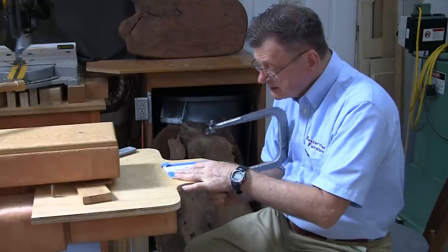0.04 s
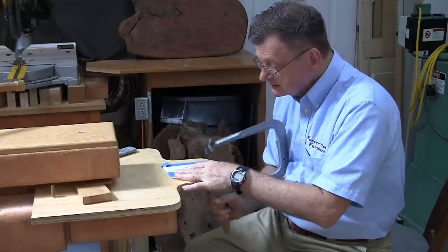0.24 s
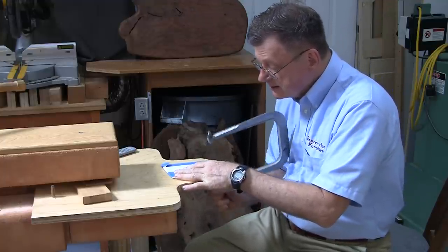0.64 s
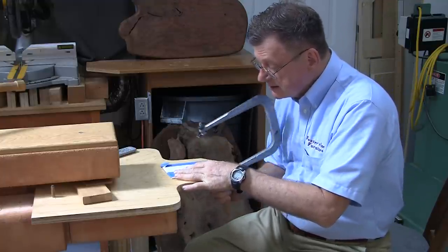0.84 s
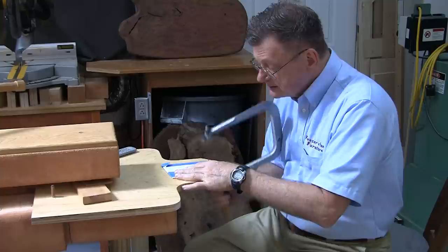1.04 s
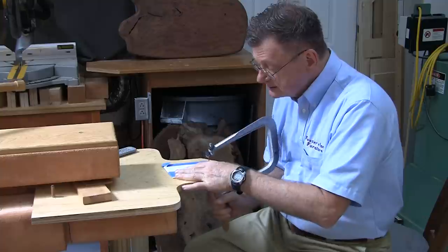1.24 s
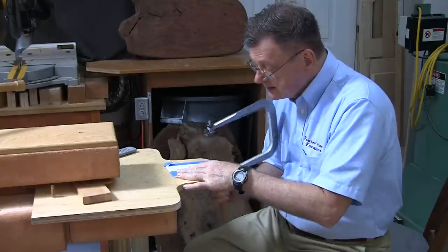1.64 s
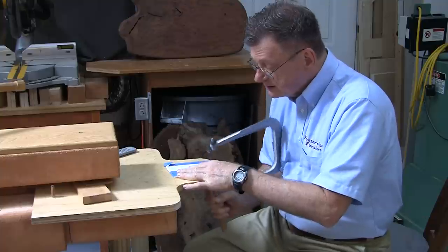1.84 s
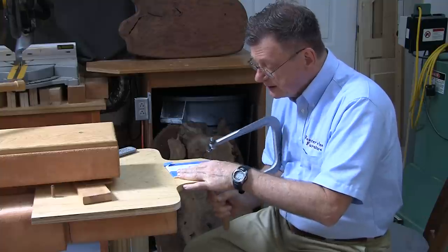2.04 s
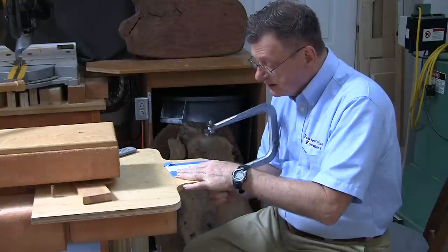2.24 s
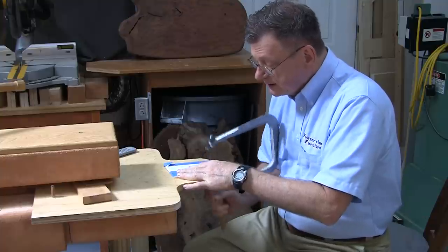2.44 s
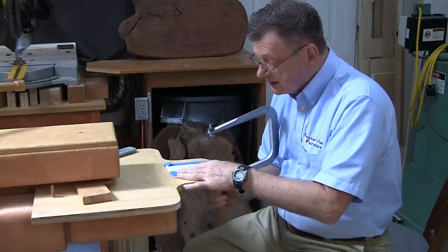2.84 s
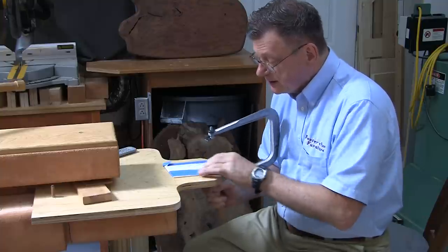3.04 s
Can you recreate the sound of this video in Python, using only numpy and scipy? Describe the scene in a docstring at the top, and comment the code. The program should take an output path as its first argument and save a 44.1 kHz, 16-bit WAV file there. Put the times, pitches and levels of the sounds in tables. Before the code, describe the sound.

A fine hand saw rasps slowly through a thin wooden sheet, close by in a small, quiet workshop. Each strong stroke makes the blade sing and the table thump; each return scrapes softly as the sheet slaps back.

```python
"""A fret saw cuts veneer on a wooden saw table in a small workshop, about three strokes in two seconds. Quiet
room noise and a low hum run throughout. From 0.2 s, on each down stroke, the teeth strike the sheet, tear
fibres and ring the table; the blade sings, and the table jolts with a thud and booms. From 0.6 s, on each way
up, the blade only scrapes, and the lifted veneer slaps back. After each sound the room rings for half a second."""
import sys
import numpy as np
from scipy import signal
from scipy.fft import rfft, irfft
from scipy.io import wavfile
from scipy.ndimage import uniform_filter1d

SR = 44100
rng = np.random.default_rng(int(sys.argv[2]) if len(sys.argv) > 2 else 0)


def unload_wav(signal):
    """Save mono or channel-first audio to the path in sys.argv[1] as 16-bit WAV at rate SR, clipped to [-1, 1]."""
    wavfile.write(
        sys.argv[1],
        SR,
        np.round(np.clip(np.atleast_2d(signal).T, -1, 1) * 32767).astype(np.int16),
    )


N = 141120


def undb(db):
    """Decibels to gain."""
    return 10 ** (np.asarray(db) / 20)


def unit_rms(x):
    """Scale to an rms of 1."""
    return x / np.sqrt(np.mean(x ** 2) + 1e-18)


def curve_at(table, f_hz):
    """Read a table on a log-frequency axis."""
    points = np.array(table, float)
    return np.interp(np.log(f_hz + 1), np.log(points[:, 0]), points[:, 1])


def wander(rate_hz):
    """Smooth random signal, spread near 1."""
    step = int(SR / rate_hz)
    stairs = np.repeat(rng.standard_normal(N // step + 1), step)
    return uniform_filter1d(stairs, step)[:N] * np.sqrt(3 / 2)


def colour(x, spectrum, modes=(), size=8192):
    """Minimum-phase filter of unit energy: a smooth spectrum with resonances on top."""
    f_hz = np.fft.rfftfreq(size, 1 / SR)
    peaks_db = sum(lift_db / (1 + (2 * (f_hz - hz) / width_hz) ** 2) for hz, width_hz, lift_db in modes)
    cepstrum = irfft(np.log(undb(curve_at(spectrum, f_hz) + peaks_db)))
    cepstrum[1:size // 2] *= 2
    cepstrum[size // 2 + 1:] = 0
    response = irfft(np.exp(rfft(cepstrum)))
    return signal.fftconvolve(x, response / np.sqrt(np.sum(response ** 2)))[:N]


def clicks(times_s, gains):
    """Impulses, each shared between two samples."""
    out = np.zeros(N + 2)
    position = np.clip(np.asarray(times_s) * SR, 0, N)
    index = position.astype(int)
    np.add.at(out, index, gains * (1 - position + index))
    np.add.at(out, index + 1, gains * (position - index))
    return out[:N]


# room noise spectrum: f/Hz, level/dB
AIR_SPECTRUM = [(20, -25), (80, -14), (240, 3), (400, -8), (700, -13), (1200, -9.5), (3000, -15.5),
                (8000, -24), (12000, -30), (16000, -39)]


def room_air(t, noise_db=-53, hum_hz=129, hum_db=-66):
    """Quiet room noise, half common to both sides, with a wavering hum."""
    common = rng.standard_normal(N)
    noise = np.array([colour(unit_rms(common + rng.standard_normal(N)), AIR_SPECTRUM) for _ in range(2)])
    hum = undb(hum_db + 2 * wander(6)) * np.sin(2 * np.pi * hum_hz * t)
    return undb(noise_db) * noise + hum


def stroke_force(age_s, attack_s, hold_s, fade_db_per_s):
    """Force of one stroke: it builds, holds and fades."""
    release_s = np.maximum(age_s - attack_s - hold_s, 0)
    return np.clip(age_s / attack_s, 0, 1) ** 1.14 * undb(-fade_db_per_s * release_s)


def fibres(snaps_per_s=2600, scatter_db=7, grip_db=-0.97):
    """Dense tiny snaps of wood fibres under a wavering grip."""
    snaps = (rng.random(N) < snaps_per_s / SR) * rng.choice([-1, 1], N)
    gains = undb(scatter_db * np.clip(rng.standard_normal(N), -2, 2))
    return unit_rms(snaps * gains) * undb(grip_db * wander(70))


# resonances of table and sheet: f/Hz, width/Hz, lift/dB
WOOD_MODES = [(246, 20, 6), (323.6, 59, 8.5), (513, 45, 3.5), (574, 75, 7), (724.5, 35, 6.5),
              (768, 41, 4.5), (944, 39, 2.5), (1230, 186, 5.5), (1607, 48, 2.5), (1760, 180, 2.5),
              (2550, 440, 3.5), (2990, 640, 4)]
# spectra of rub, hiss and shaken table: f/Hz, level/dB
RUB_SPECTRUM = [(90, -28.5), (250, -2), (700, -3), (1800, 5), (3200, 0.5), (3800, -6.5), (6500, -12),
                (10000, -85), (16000, -59)]
HISS_SPECTRUM = [(1000, -24), (3500, 6), (5500, 4), (9000, 1.5), (11500, -9.5), (16000, -18)]
TABLE_SPECTRUM = [(30, -42), (95, -23), (130, -4.5), (260, -4.5), (420, -9), (700, -0.5), (1200, -13.5),
                  (4000, -39.5)]
# light scrapes: t/s, attack/s, hold/s, rub/dB, hiss/dB, table/dB
KERF_SCRAPES = [(-.02, 0.0067, 0.0089, -44, -55, -43.5), (0.614, 0.019, 0.12, -30, -44.5, -37.5),
                (0.706, 0.022, 0.051, -55, -49.5, -36), (1.369, 0.053, 0.083, -33.5, -43.5, -35.5),
                (1.472, 0.0098, 0.063, -39, -65, -37), (1.64, 0.036, 0.017, -40, -51.5, -46.5),
                (2.08, 0.015, 0.1, -36, -44, -46.5), (2.197, 0.0073, 0.019, -34.5, -48, -32.5),
                (2.623, 0.026, 0.071, -32, -39.5, -60), (2.74, 0.027, 0.033, -30.5, -37.5, -33),
                (2.885, 0.024, 0.011, -29.5, -47, -26.5)]


def scrapes(t, fade_db_per_s=253):
    """The backs of the teeth rub through the kerf and lightly shake the table."""
    drives = np.zeros((3, N))
    for start_s, attack_s, hold_s, *levels_db in KERF_SCRAPES:
        drives += undb(levels_db)[:, None] * stroke_force(t - start_s, attack_s, hold_s, fade_db_per_s)
    spectra = RUB_SPECTRUM, HISS_SPECTRUM, TABLE_SPECTRUM
    return sum(colour(drive * fibres(), spectrum, WOOD_MODES) for drive, spectrum in zip(drives, spectra))


def bending_waves(x, spread_s=0.001992):
    """Bending waves in the sheet: each frequency leaves with its own small delay."""
    spectrum = rfft(x)
    delay_s = spread_s * np.abs(wander(60)[:len(spectrum)])
    return irfft(spectrum * np.exp(-2j * np.pi * np.cumsum(delay_s) * SR / N), N)


# blade speed on the down strokes: t/s, tooth rate/Hz
BLADE_SPEED = [(.215, 371.2), (.24, 350.4), (.262, 347.4), (.295, 325.5), (1.1, 285.7), (1.17, 278.1),
               (1.25, 284), (1.8, 240.9), (1.835, 226.2), (1.88, 246.6), (2.44, 264.1), (2.49, 296.4),
               (2.6, 293.9)]


def tooth_rate(t, unsteadiness=0.015):
    """Teeth crossing the sheet per second, driven by an unsteady hand."""
    return np.interp(t, *np.array(BLADE_SPEED).T) * (1 + unsteadiness * wander(60))


def tooth_knocks(t, cycles, scatter_cycles=0.0802, scatter_db=7.5):
    """One impulse per tooth; uneven teeth scatter timing and level."""
    teeth = np.arange(int(cycles[-1]))
    timing, strength = rng.standard_normal((N // 64, 2))[:len(teeth)].T
    times_s = np.interp(teeth + scatter_cycles * timing, cycles, t)
    return clicks(times_s, undb(scatter_db * np.tanh(strength)))


# spectra of tearing, tooth knocks and table thrum: f/Hz, level/dB
RASP_SPECTRUM = [(70, -54), (200, -4), (450, 0), (650, 2), (1200, 0), (3200, 0), (3850, -9.5), (6500, -23),
                 (10000, -28), (16000, -39)]
TEETH_SPECTRUM = [(70, -38), (260, -9.5), (430, -1), (600, 0.5), (1000, -1.5), (1500, -3), (2800, -7.5),
                  (4500, -12), (16000, -47)]
THRUM_SPECTRUM = [(30, -42), (95, -36), (135, -6), (215, -4), (320, -5), (450, -3), (900, -24.5),
                  (4000, -54)]
# down strokes: t/s, attack/s, hold/s, fade/(dB/s), rasp/dB, hiss/dB, teeth/dB, thrum/dB
DOWN_STROKES = [(0.196, 0.028, 0.077, 268, -23, -32, -22.5, -27.5),
                (1.071, 0.033, 0.044, 176, -21, -30.5, -25.5, -25.5),
                (1.769, 0.032, 0.095, 269, -22.5, -37, -25.5, -27.5),
                (2.411, 0.034, 0.065, 219, -20.5, -32.5, -23, -32)]


def cuts(t, tooth_hz, brake_s=0.095, slowest_hz=124.4, tear_cycles=0.3, tear_floor=0.24, lag_s=0.019):
    """Each tooth knocks the sheet and tears fibres; the cut hisses and the table thrums just after."""
    rasp, hiss, teeth, thrum = np.zeros((4, N))
    for start_s, attack_s, hold_s, fade_db_per_s, rasp_db, hiss_db, teeth_db, thrum_db in DOWN_STROKES:
        age_s = t - start_s
        force = stroke_force(age_s, attack_s, hold_s, fade_db_per_s)
        late_force = stroke_force(age_s - lag_s, attack_s, hold_s, fade_db_per_s)
        # the saw brakes to a coarse chatter at the bottom of the stroke
        braking = np.exp(-np.maximum(age_s - attack_s - hold_s, 0) / brake_s)
        rate_hz = np.maximum(tooth_hz * braking, slowest_hz)
        cycles = np.cumsum(rate_hz) / SR
        knocks = np.sqrt(SR / rate_hz) * tooth_knocks(t, cycles)
        bursts = tear_floor + np.exp(-(cycles % 1) / tear_cycles)
        tearing = unit_rms(bursts * rng.standard_normal(N))
        rasp += undb(rasp_db) * force * tearing
        hiss += undb(hiss_db) * force ** 1.2 * fibres()
        teeth += undb(teeth_db) * force * knocks
        thrum += undb(thrum_db) * late_force ** 1.24 * unit_rms(knocks + 1.58 * tearing)
    sheet = colour(rasp, RASP_SPECTRUM, WOOD_MODES) + colour(teeth, TEETH_SPECTRUM, WOOD_MODES)
    sheet += colour(hiss, HISS_SPECTRUM)
    return bending_waves(sheet) + colour(thrum, THRUM_SPECTRUM, WOOD_MODES)


# blade notes: t/s, length/s, multiple of tooth rate, level/dB, overtones/dB re note, groan/dB
BLADE_NOTES = [(0.209, 0.12, 2, -14, -6.5, -21), (1.087, 0.168, 2, -18, -12, -17),
               (1.81, 0.12, 3, -24.5, -32, -33), (2.442, 0.17, 2, -16, -1.5, -27.5)]
# blade overtones: multiple of tooth rate, relative level/dB
BLADE_OVERTONES = [(3, -7), (4, -4), (5, -4), (6, -10)]


def blade_song(t, tooth_hz, edge_s=0.029, flutter_db=3, fade_db_per_s=35.6,
               groan_peak_s=0.053, groan_width_s=0.031):
    """The taut blade rings on a multiple of the tooth rate, over a brief groan at the rate itself."""
    out = np.zeros(N)
    phase = 2 * np.pi * np.cumsum(tooth_hz) / SR
    for start_s, length_s, multiple, level_db, overtones_db, groan_db in BLADE_NOTES:
        age_s = np.clip(t - start_s, 0, length_s)
        gate = np.clip(np.minimum(age_s, length_s - age_s) / edge_s, 0, 1)
        upper = sum(undb(db + flutter_db * wander(50)) * np.sin(k * phase) for k, db in BLADE_OVERTONES)
        note = undb(flutter_db * np.tanh(wander(70))) * np.sin(multiple * phase)
        note += undb(overtones_db) * upper
        groan = np.exp(-((age_s - groan_peak_s) / groan_width_s) ** 2) * np.sin(phase)
        out += gate * (undb(level_db - fade_db_per_s * age_s) * note + undb(groan_db) * groan)
    return out


# table jolts: t/s, thud/dB, boom/dB
TABLE_JOLTS = [(0.317, -18.5, -34.5), (1.189, -23, -37.5), (1.828, -17.5, -38), (1.902, -21, -35),
               (2.466, -32, -43), (2.93, -29.5, -42)]


def jolts(t, thud_hz=219, thud_width_s=0.012, boom_hz=125.2, boom_rise_s=0.023, boom_t60_s=0.87):
    """The table jolts with a thud; its lowest mode swells and booms on."""
    out = np.zeros(N)
    for at_s, thud_db, boom_db in TABLE_JOLTS:
        offset_s = t - at_s
        thud = np.exp(-(offset_s / thud_width_s) ** 2) * np.sin(2 * np.pi * thud_hz * offset_s)
        age_s = np.maximum(offset_s, 0)
        swell = np.minimum(age_s / boom_rise_s, 1) * undb(-60 * age_s / boom_t60_s)
        boom = swell * np.sin(2 * np.pi * boom_hz * age_s)
        out += undb(thud_db) * thud + undb(boom_db) * boom
    return out


# clack spectrum: f/Hz, level/dB
CLACK_SPECTRUM = [(80, -74), (200, 2), (700, -5), (1900, 8.5), (3200, -1), (4500, -4), (9000, -21),
                  (16000, -24)]
# veneer slaps: t/s, relative clack/dB, relative edge/dB
VENEER_SLAPS = [(0.72, -7, -35), (0.7253, -3, -45), (.7312, -5, -42), (1.406, -5, -38), (1.411, -9, -32),
                (2.1008, -18.5, -29.5), (2.107, -20.5, -30), (2.131, -20, -33), (2.2194, -16, -31.5),
                (2.79, -10, -35), (2.801, -16, -27), (2.926, -25, -32)]


def slaps(t, rattle_s=0.0024):
    """The sheet snaps back on the table: a woody clack with a brief rattle and a bright edge."""
    clack, edge = np.zeros((2, N))
    for at_s, clack_db, edge_db in VENEER_SLAPS:
        rattle = (t > at_s) * np.exp(-np.abs(t - at_s) / rattle_s) * rng.standard_normal(N)
        crack = clicks([at_s], 1) + rattle / np.sqrt(np.sum(rattle ** 2))
        clack += undb(clack_db) * crack
        edge += undb(edge_db) * crack
    return undb(7) * colour(clack, CLACK_SPECTRUM, WOOD_MODES) + undb(15) * colour(edge, HISS_SPECTRUM)


# room decay: f/Hz, T60/s
WORKSHOP_DECAY = [(120, 0.54), (300, 0.28), (700, 0.5661), (2500, 0.4055), (6000, 0.65), (14000, 0.15)]
# room width: f/Hz, side/dB re mid
WORKSHOP_WIDTH = [(100, -32), (260, -19.5), (520, -11), (1000, -2), (3000, 1.5), (12000, 2)]


def workshop_ring(t, build_s=0.00047, smoothing_hz=30):
    """Stereo room response: decaying octave bands, even in colour, the bass alike on both sides."""
    f_hz = np.fft.rfftfreq(N, 1 / SR)
    mid, side = rfft(rng.standard_normal((2, N)))
    width = undb(curve_at(WORKSHOP_WIDTH, f_hz))
    pair = np.array([mid + width * side, mid - width * side]) / np.sqrt(1 + width ** 2)
    centres_hz = np.geomspace(60, 15360, 9)
    ring = np.zeros((2, N))
    for hz, weights in zip(centres_hz, np.eye(len(centres_hz))):
        band = irfft(pair * curve_at(np.c_[centres_hz, weights], f_hz), N)
        ring += band * undb(-60 * t / curve_at(WORKSHOP_DECAY, hz))
    spectrum = rfft(ring * np.clip(t / build_s, 0, 1))
    power = uniform_filter1d(np.mean(np.abs(spectrum) ** 2, axis=0), size=int(smoothing_hz * N / SR))
    ring = irfft(spectrum / np.sqrt(power), N)[:, :SR]
    return ring / np.sqrt(np.sum(ring ** 2) / 2)


# stereo balance: f/Hz, left minus right/dB
SAW_BALANCE = [(100, 0.7), (500, 1.1), (2000, 2.5), (4000, 1.6), (13000, 1.2)]


def scene(wood_send_db=1, tone_send_db=-4.5, saw_db=-3):
    """The saw, a little to the left, and its ring in the room, over quiet air."""
    t = np.arange(N) / SR
    tooth_hz = tooth_rate(t)
    wood = cuts(t, tooth_hz) + bending_waves(scrapes(t)) + slaps(t)
    tones = blade_song(t, tooth_hz) + jolts(t)
    send = undb(wood_send_db) * wood + undb(tone_send_db) * tones
    reverb = signal.fftconvolve(send[None], workshop_ring(t), axes=1)[:, :N]
    balance_db = curve_at(SAW_BALANCE, np.fft.rfftfreq(N, 1 / SR))
    pan = undb([balance_db / 2, -balance_db / 2])
    saw = irfft(rfft(wood + tones + reverb) * pan, N)
    return undb(saw_db) * saw + room_air(t)


def record(dry, cutoff_hz=15850):
    """Steep elliptic low-pass."""
    return signal.sosfilt(signal.ellip(10, .2, 80, cutoff_hz, fs=SR, output="sos"), dry)


dry = scene()
out = record(dry)
unload_wav(out)
```